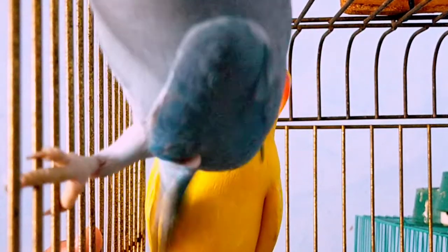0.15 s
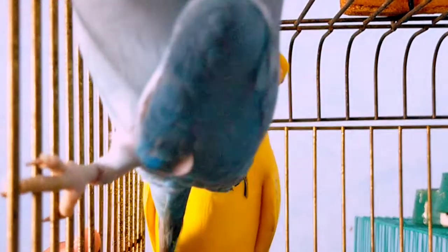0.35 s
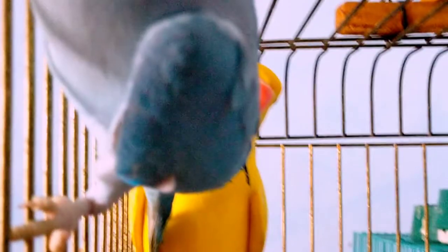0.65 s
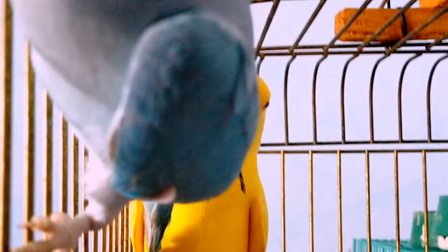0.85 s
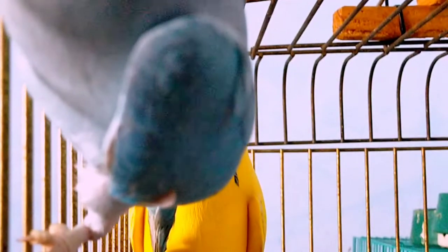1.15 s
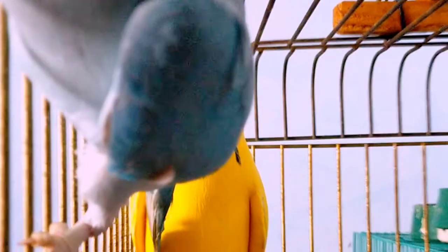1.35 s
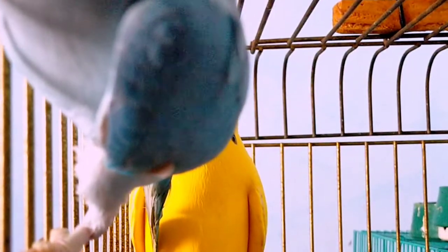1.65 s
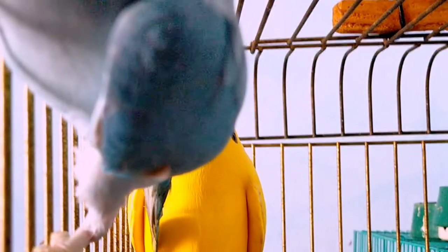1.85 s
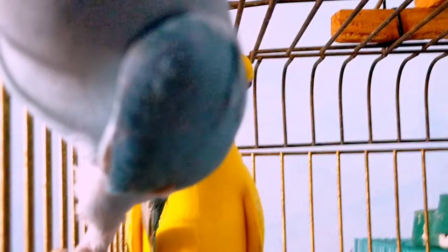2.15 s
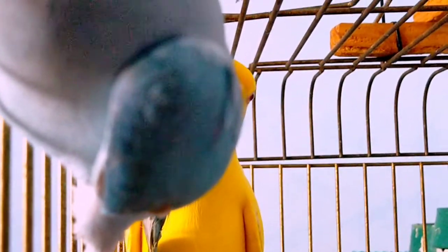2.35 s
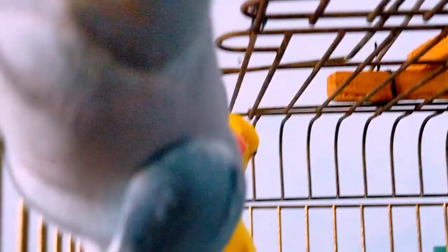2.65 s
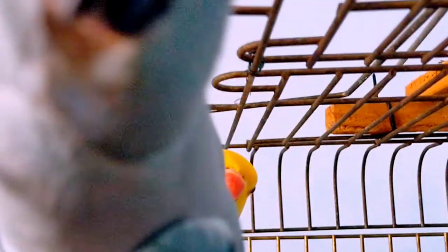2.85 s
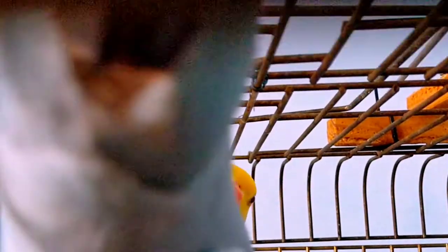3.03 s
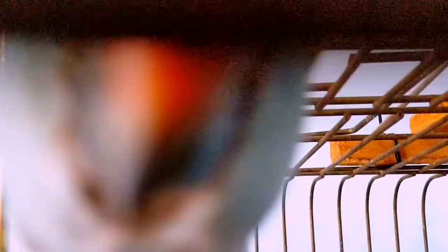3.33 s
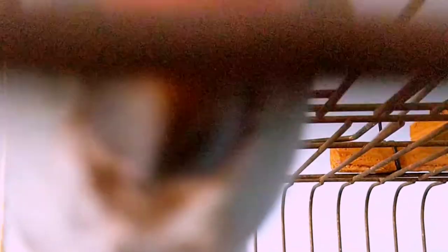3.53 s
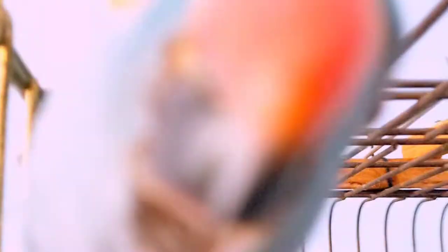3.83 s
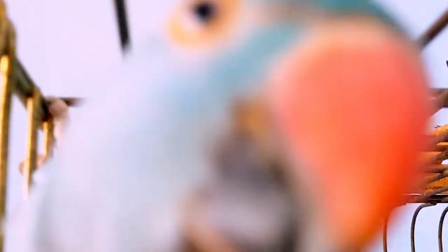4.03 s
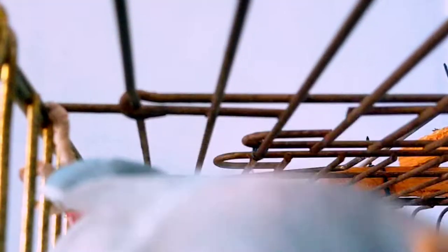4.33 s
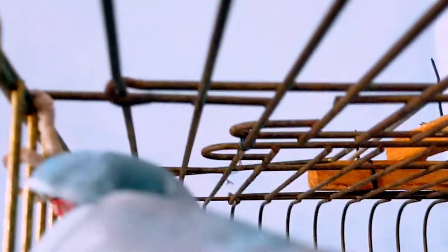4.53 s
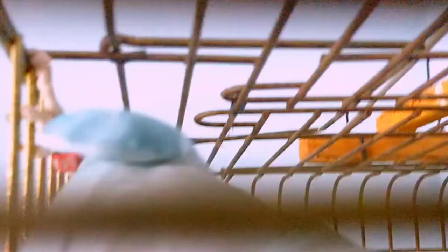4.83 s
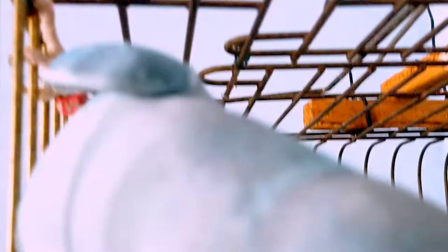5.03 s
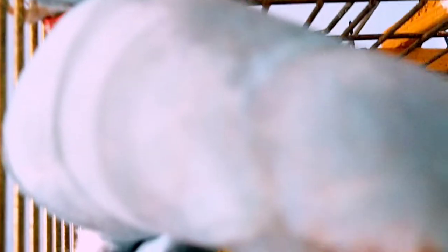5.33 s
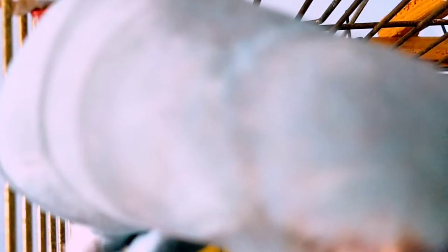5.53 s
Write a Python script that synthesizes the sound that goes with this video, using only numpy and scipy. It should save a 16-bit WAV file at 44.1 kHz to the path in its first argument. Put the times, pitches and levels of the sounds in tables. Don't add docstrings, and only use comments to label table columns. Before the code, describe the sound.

Bare, reverberant room with low engine rumble, dull murmur and light hiss. Wire ticks and a bump come first, then one short harsh parakeet squawk. Distant crowing and a cluster of cage rattles follow; then two stronger, longer screeches under a second apart, close and distorted, each leaving a short bright echo and a dull low puff. Soft claw scratches and tray bumps end it.

```python
import sys
import numpy as np
from scipy import signal
from scipy.fft import rfft, irfft
from scipy.io import wavfile
from scipy.ndimage import uniform_filter1d, map_coordinates

SR = 44100
rng = np.random.default_rng(int(sys.argv[2]) if len(sys.argv) > 2 else 0)


def output_pcm(signal):
    pcm = np.clip(np.atleast_2d(signal).T, -1, 1) * 32767
    wavfile.write(sys.argv[1], SR, np.round(pcm).astype(np.int16))


def volts(x):
    e = np.asarray(x, float) / 20
    return 10 ** e


N = 250488

QUIET_DB = -57


def unit(x):
    return x / np.sqrt(np.mean(x ** 2) + 1e-20)


def along(points, hz):
    f, v = np.transpose(points)
    return np.interp(np.log(hz + 1), np.log(f + 1), v)


def curves(rows, t):
    s, *cols = np.transpose(rows)
    return [np.interp(t, s, c) for c in cols]


def span(rows):
    return np.arange(round(rows[0][0] * SR), min(round(rows[-1][0] * SR), N))


def wobble(rate, size=N):
    points = rng.standard_normal(int(size * rate / SR) + 4)
    return map_coordinates(points, [np.arange(size) * rate / SR])


def swells(rows):
    t = np.arange(N) / SR
    total = np.zeros(N)
    for s, length, db in rows:
        arch = np.sin(np.pi * np.clip((t - s) / length, 0, 1))
        total += volts(db) * np.clip(2 * arch, 0, 1) ** 2
    return total


def noise(spectrum, patchy_db=0., size=N):
    z = signal.stft(rng.standard_normal(size + 1024), nperseg=1024)[2]
    field = uniform_filter1d(rng.standard_normal(z.shape), 6, 0)
    field = uniform_filter1d(field, 8, 1)
    x = signal.istft(z * volts(patchy_db * unit(field)), nperseg=1024)[1]
    colour = volts(along(spectrum, np.fft.rfftfreq(len(x), 1 / SR)))
    return unit(irfft(rfft(x) * colour, len(x))[:size])


def stack(pitch_hz, throat, jitter, tilt_db, count):
    pitch_hz = pitch_hz * (1 + jitter * wobble(250.6, size=len(pitch_hz)))
    turn = 2 * np.pi * np.cumsum(pitch_hz) / SR
    total = np.zeros(len(pitch_hz))
    for k in range(1, count + 1):
        gain = volts(along(throat, k * pitch_hz) + tilt_db * (k - 3.5))
        total += gain * (k * pitch_hz < 16000) * np.sin(k * turn)
    return total


def room(x, gap):
    # (frequency [Hz], time [s])
    decay = [(200, 0.36), (1500, 0.64), (4000, 0.55), (8000, 0.44), (15000, 0.26)]
    hz, t, z = signal.stft(rng.standard_normal(SR), SR, nperseg=256)
    fading = z * volts(-60 * t / along(decay, hz)[:, None])
    tail = signal.istft(fading, SR, nperseg=256)[1][:SR]
    tail = tail * np.clip(np.arange(len(tail)) / SR / gap, 0, 1)
    return signal.fftconvolve(x, tail / np.linalg.norm(tail))


def add(out, start, x, wet_db, dry_db=0., gap=0.0045):
    wet = volts(wet_db) * room(x, gap)
    out[start:start + len(x)] += volts(dry_db) * x
    out[start:start + len(wet)] += wet


def street():
    # (time [s], level [dB])
    murmur = [(0, -45), (.31, -47.5), (.45, -41.5), (.61, -48.5), (.8, -47), (1.6, -46), (1.91, -48.5),
              (2.43, -47.5), (2.6, -50), (3.04, -49), (3.16, -48), (3.35, -50.5), (4.85, -46),
              (5.15, -48.5), (5.36, -41.5), (5.58, -47.5), (5.68, -42)]
    # (frequency [Hz], level [dB per Hz])
    town = [(180, -31.5), (300, -10), (754, -3), (831, -7.5), (916, -5), (1540, -6), (1870, -6.5),
            (3330, -22.5), (4000, -26), (5200, -53.5), (8800, -120)]
    hiss_colour = [(1760, -14.5), (3000, -10), (3350, -25.5), (4280, -9), (4810, -14), (8340, -14),
                   (12200, -21.5), (15800, -7)]
    drone = [(12, -33.5), (20, -2), (65, -7.5), (113, 1), (160, -3), (216, -2), (261, -8.5), (400, -18),
             (520, -49.5), (880, -120)]
    booms_hz = [48.5, 76.6, 155.4]
    idle_levels = [-52, -54.5, -54]
    # (time [s], length [s], level [dB])
    surges = [
        [(0, 0.5, -49), (.95, .12, -43.5), (1.4, .3, -43), (1.75, 0.44, -58), (3.97, 0.27, -40.5),
         (4.45, 0.41, -45), (5.38, 0.42, -44)],
        [(.33, .35, -55), (1.64, 0.25, -48.5), (2.43, .34, -40.5), (3.22, 0.26, -42), (3.72, 0.19, -47),
         (4.5, 0.2, -44)],
        [(.32, 0.16, -49), (1.62, 0.2, -42), (2.45, 0.13, -45.5), (3.72, 0.2, -41.5), (4.49, .2, -40.5)],
    ]
    # (time [s], length [s], level [dB])
    lorries = [
        (.33, 0.258, -49),
        (2.4, 0.32, -62),
        (5.55, .3, -57),
    ]
    # (time [s], length [s], depth [dB])
    lulls = [
        (1.06, 0.081, 10.5),
        (3.64, .07, 12),
        (4.24, 0.12, 15),
        (4.4, 0.0476, 11),
    ]
    # (time [s], length [s], level [dB])
    rustles = [
        (.34, .14, -55),
        (2.3, .25, -53),
        (2.5, 0.47, -63.5),
        (5.1, 0.49, -63),
        (5.55, .25, -54),
    ]
    murmur_db, = curves(murmur, np.arange(N) / SR)
    rumble = volts(8.0) * (volts(-57.5) + swells(lorries)) * noise(drone, patchy_db=2.5)
    for hz, idle_db, rows in zip(booms_hz, idle_levels, surges):
        level = (volts(idle_db) + swells(rows)) * volts(0.5 + 3.84 * wobble(14))
        pitch_hz = hz * (1 + 0.035 * wobble(25))
        rumble += level * np.sin(2 * np.pi * np.cumsum(pitch_hz) / SR)
    hiss = volts(5.5) * (volts(-61.5) + swells(rustles)) * noise(hiss_colour, patchy_db=2.5)
    return rumble / (1 + swells(lulls)) + volts(murmur_db) * noise(town, patchy_db=2.5) + hiss


def fowl(out):
    # (time [s], length [s], pitch [Hz], level [dB], time of the peak [share of length])
    crows = [
        (0, 0.38, 750, -57.5, 0.38),
        (0.694, 0.24, 679, -61, .55),
        (1.18, .5, 879, -47.5, 0.22),
        (1.74, 0.294, 780, -53.5, .6),
        (2.059, 0.269, 780, -44.5, .5),
        (3.177, 0.252, 961, -54.5, .4),
        (3.719, 0.33, 965, -46, 0.44),
        (4.85, 0.33, 618, -68, 0.38),
    ]
    # (frequency [Hz], gain [dB])
    crow_throat = [(600, 16.5), (900, -8), (1600, -3), (1900, 1.5), (2350, -5.5), (3200, -33)]
    for s, length, hz, top_db, share in crows:
        rows = [(s, hz * .998, top_db - 5),
                (s + share * length, hz, top_db),
                (s + length, hz * .975, top_db - 13)]
        n = span(rows)
        pitch_hz, db = curves(rows, n / SR)
        note = volts(db) * stack(pitch_hz, crow_throat, jitter=0.009, tilt_db=0, count=4)
        add(out, n[0], note, wet_db=4.0, dry_db=-4.0)


def cage(out):
    # (time [s], peak level [dB], wire pitch [ratio], ring share [dB])
    claws = [(0, -44, 0.93, -23), (0.246, -52, 1.1, -3.5), (0.269, -45.5, 0.54, -12), (0.339, -44, .97, 1),
             (.459, -43.5, 1.02, 6), (.5054, -54, 1.02, 17.5), (0.824, -43.5, 1.2, -8.5),
             (1.62, -64, 0.71, -18.5), (1.82, -59.5, 1, -14), (2.042, -65.5, 1, -17),
             (2.2389, -44, 1.1, -9.5), (2.268, -38.5, 0.83, -8.5), (2.3067, -46, 1.02, 12.5),
             (2.42, -55.5, 1.2, -3), (2.4616, -42, 0.81, -17.5), (2.5373, -49.5, .99, 14.5),
             (2.7727, -51, 0.75, -19), (3.061, -56.5, 1.04, 3), (4.8006, -56.5, 1, 5.5),
             (4.86, -54, 1, 9.5), (4.905, -49.5, 0.75, -1), (5.071, -50, .97, 5), (5.322, -57, 0.87, -10),
             (5.4114, -38.5, 1.06, -12.5), (5.5619, -45, .98, -2.5)]
    # (frequency [Hz], level [dB], time to fall 60 dB [s])
    wire = [(3990, -19, 0.22), (6100, -24, .1), (7930, -6, .08), (10200, -8.5, 0.063), (12400, -2, 0.052),
            (15200, 3, .06)]
    # (frequency [Hz], level [dB per Hz])
    scrape = [(1180, -32), (2000, -3.5), (2980, -13.5), (4670, -9), (6160, -15), (8550, -6.5), (15800, -9)]
    tray = [(59, -25), (100, -7.5), (249, -3.5), (389, -14), (710, -3), (868, -8.5), (1490, -1),
            (4000, -27.5), (5200, -62), (8800, -120)]
    # (time [s], level [dB])
    knocks = [
        (.385, -35.5),
        (2.275, -39),
        (3.001, -45.5),
        (5.175, -37.5),
        (5.4, -49.5),
        (5.569, -43.5),
    ]
    t = np.arange(SR // 4) / SR
    for s, db, stretch, ring_db in claws:
        spread = stretch * (1 + .016 * rng.standard_normal((5, 1)))
        ring = np.zeros(len(t))
        for hz, level, t60 in wire:
            fading = volts(level + rng.normal(0, 1.5) - 60 * t / t60)
            ring += fading * np.sin(2 * np.pi * hz * spread * t).sum(0)
        scratch = volts(-60 * t / 0.043) * noise(scrape, size=len(t))
        tick = volts(db) * (scratch + volts(ring_db - 11.5) * ring)
        add(out, round(s * SR), tick, wet_db=8, dry_db=-4)
    for s, db in knocks:
        bump = volts(db - 60 * t / 0.084) * np.clip(t / 0.0042, 0, 1)
        add(out, round(s * SR), bump * noise(tray, size=len(t)), wet_db=8.5, dry_db=-3)


def breath(onset, t, pitch_hz):
    s, rise, hold, peak_db, low_db = onset
    start_db = QUIET_DB + (peak_db - QUIET_DB) * np.clip((t - s) / rise, 0, 1) ** 0.64
    fade_db = peak_db - 1001 * (t - s - rise - hold)
    loose_db = low_db - 28.5 * np.clip(pitch_hz - 1775, 0, None) / 1000
    hiss_db = -45.5
    return np.minimum(start_db, np.maximum(np.maximum(fade_db, loose_db), hiss_db))


def parakeets(out):
    # (frequency [Hz], gain [dB])
    throat = [(1500, -10.5), (2200, -3.5), (3200, -1), (4200, 2), (5200, -9), (6400, -16), (7200, -14),
              (8300, -6.5), (9600, -18), (11000, -21.5), (12800, -21), (14000, -25), (15700, -18)]
    # (frequency [Hz], level [dB per Hz])
    rasp_colour = [(290, -50.5), (500, -25), (968, -13), (1350, -14), (1490, -7.5), (1960, 1), (3100, -2),
                   (3530, -3.5), (7030, -15), (8240, -6.5), (12100, -23), (15500, -45.5)]
    # (time [s], rasp rise [s], rasp hold [s], rasp peak [dB], rasp at the bottom of the cry [dB])
    breaths = [
        (0.845, 0.017, 0.019, -18, -28.5),
        (3.394, .022, .008, -16, -23.5),
        (4.147, 0.026, .026, -19, -22),
    ]
    # (time [s], pitch [Hz], voice level [dB])
    voices = [
        [(.856, 2650, -27), (.885, 2460, -13), (.891, 2450, -27), (.894, 3545, -22), (.918, 3485, -15),
         (.921, 2520, -19), (.995, 2170, -16), (1.04, 1900, -15), (1.078, 1690, -23)],
        [(3.402, 2640, -24), (3.416, 2622, -28), (3.419, 3225, -18), (3.445, 3215, -10.5), (3.485, 3225, -13),
         (3.546, 2790, -11), (3.549, 2190, -21), (3.586, 1760, -14.5), (3.622, 1630, -17.5)],
        [(4.163, 2300, -30), (4.166, 3171, -28), (4.2, 3155, -10.5), (4.268, 3140, -11), (4.306, 2900, -15),
         (4.309, 2350, -25), (4.335, 2040, -13), (4.355, 1720, -14), (4.378, 1620, -17)],
    ]
    release_s, release_db = .028, 46.5
    for onset, rows in zip(breaths, voices):
        first_hz = rows[0][1]
        end_s, end_hz, end_db = rows[-1]
        start = (onset[0], first_hz, QUIET_DB)
        release = (end_s + release_s, end_hz * 0.81, end_db - release_db)
        rows = [start, *rows, release]
        n = span(rows)
        t = n / SR
        pitch_hz, voice_db = curves(rows, t)
        rasp_db = breath(onset, t, pitch_hz) - release_db * np.clip((t - end_s) / release_s, 0, 1)

        chaos = np.clip(volts(rasp_db - voice_db), 0, 1)
        slack = np.clip((2900 - pitch_hz) / 900, 0, 1)
        buzz_db = 1.5 * slack - .3
        jitter = .0032 + .023 * slack + .045 * chaos
        voice = stack(pitch_hz, throat, jitter, buzz_db, count=10)
        flutter = volts((1.2 + 2 * slack) * wobble(90, size=len(n)))
        catch = np.exp(-(np.gradient(pitch_hz) * SR / 30000) ** 2)
        add(out, n[0], volts(voice_db + 9) * catch * flutter * voice, wet_db=2.0, dry_db=-1.5)

        flaps = volts(4.1 * wobble(400, size=len(n)))
        rasp = unit(flaps * noise(rasp_colour, patchy_db=1.5, size=len(n)))
        add(out, n[0], volts(rasp_db + 3.5) * rasp, wet_db=3.0, dry_db=0.5)


def scene():
    air = np.zeros(N + 2 * SR)
    fowl(air)
    cage(air)
    parakeets(air)
    mono = street() + air[:N]
    treble = signal.butter(4, 11500, 'high', fs=SR, output='sos')
    sheen = signal.sosfilt(treble, np.roll(mono, 40))
    return mono + volts(-16) * np.array([sheen, -sheen])


def capsule():
    # (time [s], swing level [dB], puff level [dB])
    snaps = [
        (1.002, -27, -44.5),
        (3.592, -26, -33.5),
        (4.361, -29, -39.5),
    ]
    # (frequency [Hz], level [dB per Hz])
    puff = [(40, -16), (90, 3), (500, -2), (1200, -5), (2500, -44)]
    out = np.zeros(N)
    for s, swing_db, puff_db in snaps:
        t = np.arange(N) / SR - s
        out += volts(swing_db) * np.sin(2 * np.pi * 3 * t) * np.exp(-((t - .07) / .16) ** 2)
        out += volts(puff_db) * np.exp(-(t / .018) ** 2) * noise(puff)
    return out


def roll_off(x):
    return signal.sosfilt(signal.butter(12, 17000, fs=SR, output="sos"), x)


def record(dry):
    keep = np.exp(-1 / (0.023 * SR))
    power = signal.lfilter([1 - keep], [1, -keep], dry[0] ** 2)
    loud_db = 10 * np.log10(power + 1e-12)
    ducked = dry * volts(-.5 * np.clip(loud_db + 19, 0, None))
    bent = ducked - 0.05 * ducked ** 2 + capsule()
    held = bent / (1 + np.abs(bent / .97) ** 8) ** (1 / 8)
    below_top = np.fft.rfftfreq(N, 1 / SR) < 15830
    held = irfft(rfft(held) * below_top, N)
    return roll_off(held)


dry = scene()
out = record(dry)
output_pcm(out)
```